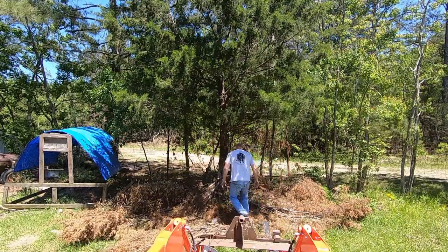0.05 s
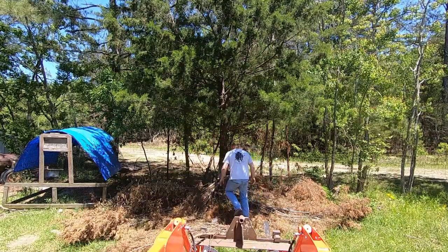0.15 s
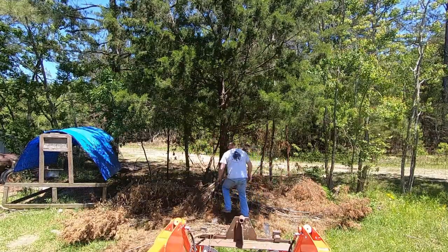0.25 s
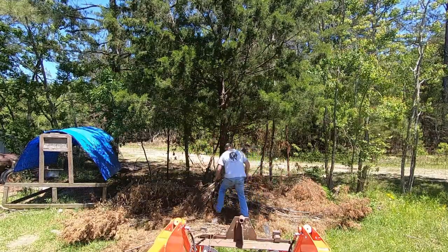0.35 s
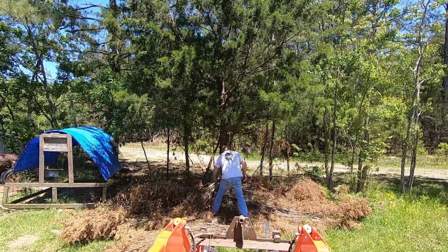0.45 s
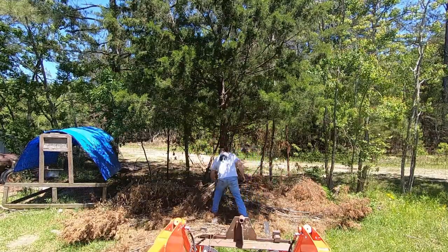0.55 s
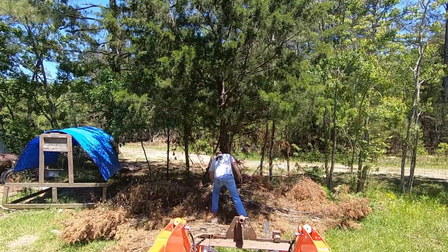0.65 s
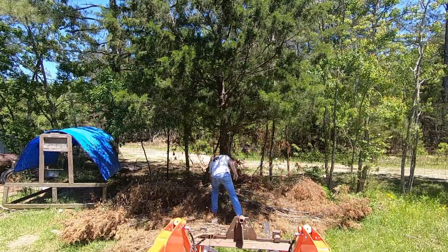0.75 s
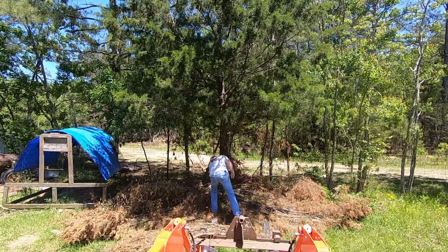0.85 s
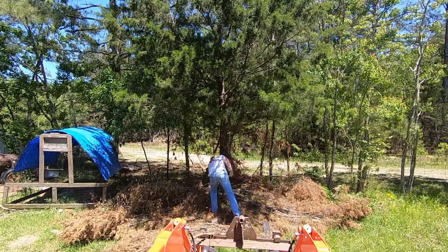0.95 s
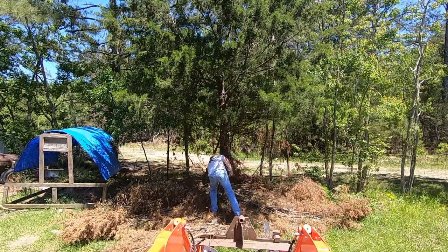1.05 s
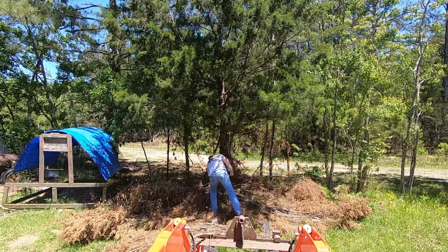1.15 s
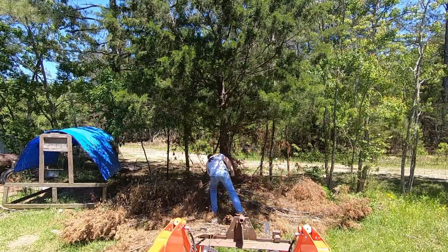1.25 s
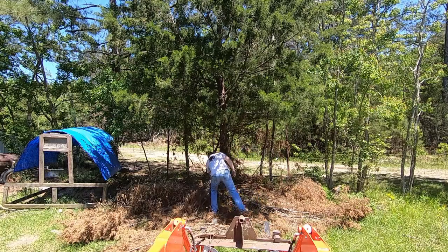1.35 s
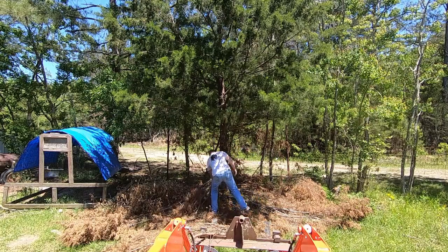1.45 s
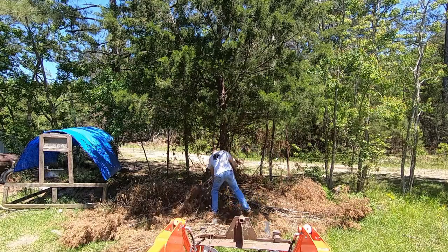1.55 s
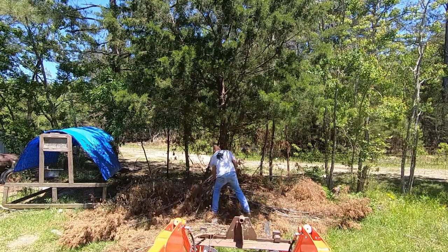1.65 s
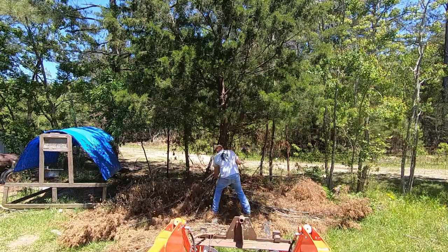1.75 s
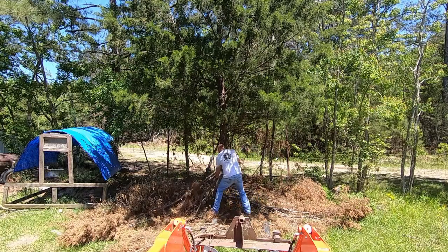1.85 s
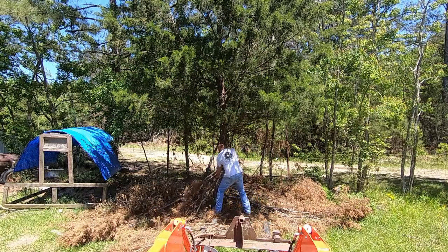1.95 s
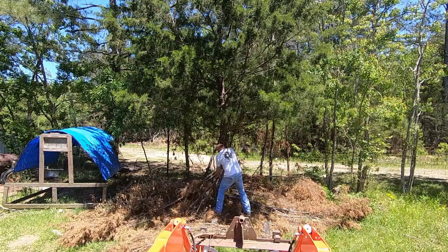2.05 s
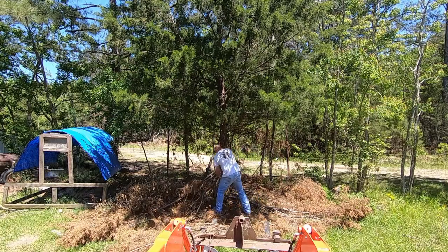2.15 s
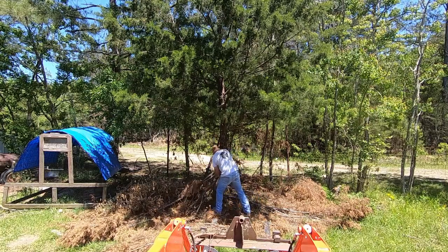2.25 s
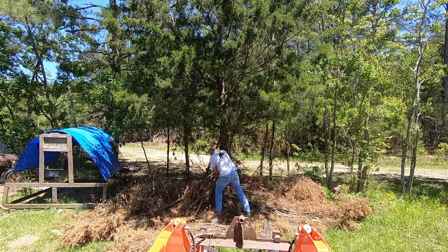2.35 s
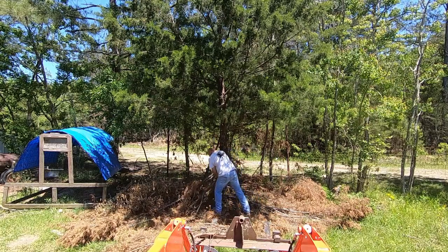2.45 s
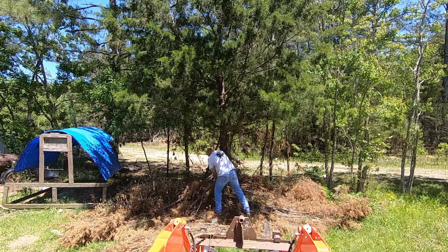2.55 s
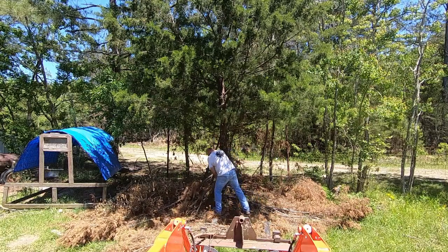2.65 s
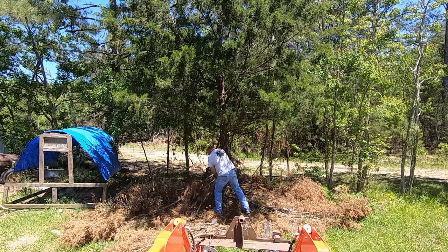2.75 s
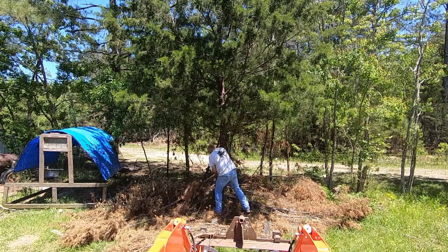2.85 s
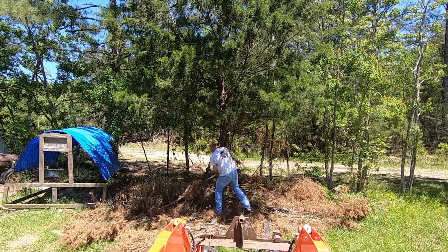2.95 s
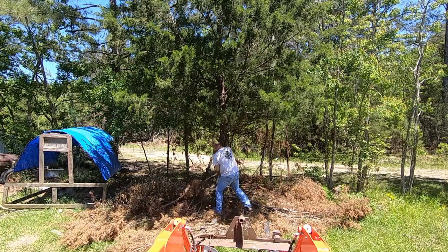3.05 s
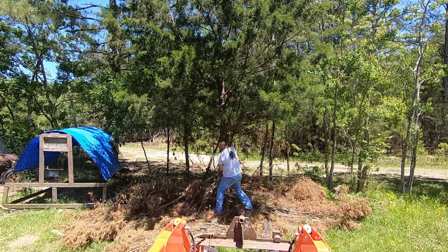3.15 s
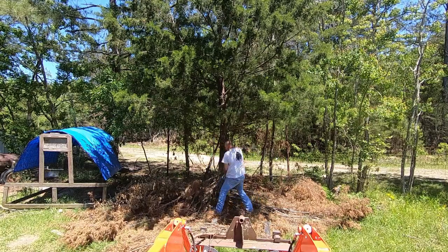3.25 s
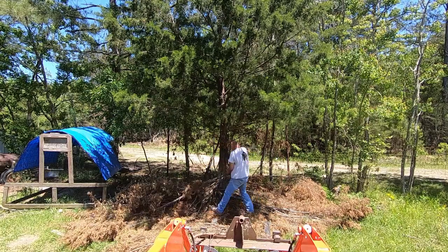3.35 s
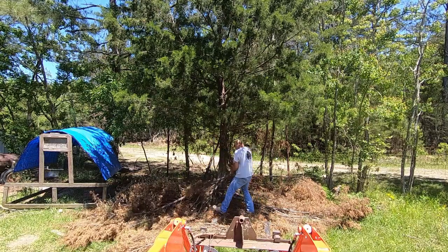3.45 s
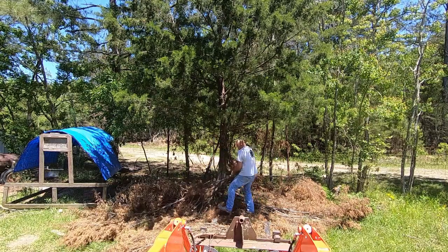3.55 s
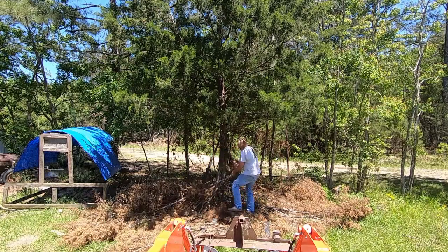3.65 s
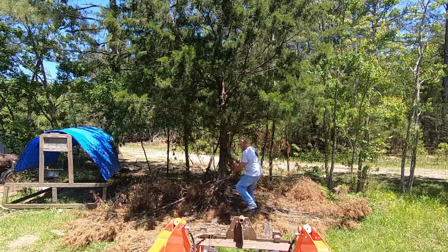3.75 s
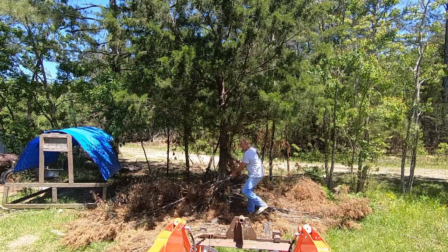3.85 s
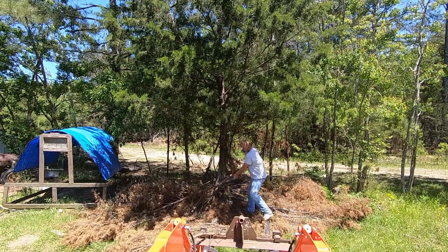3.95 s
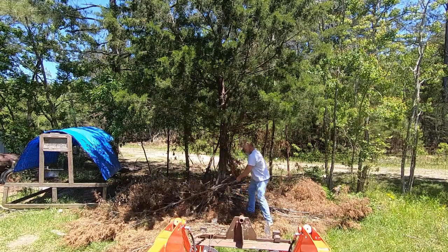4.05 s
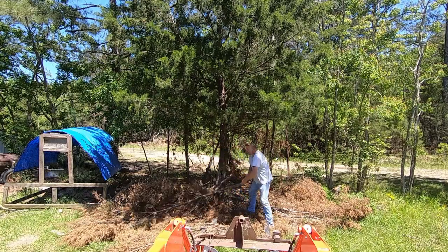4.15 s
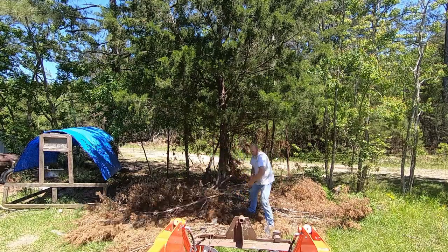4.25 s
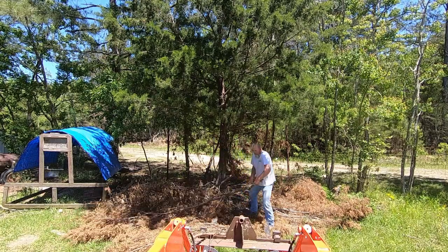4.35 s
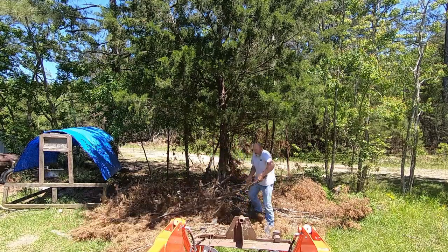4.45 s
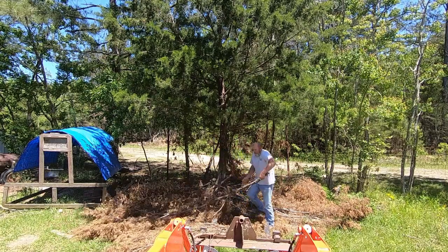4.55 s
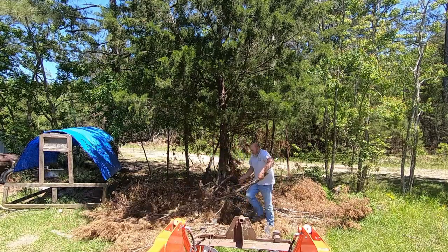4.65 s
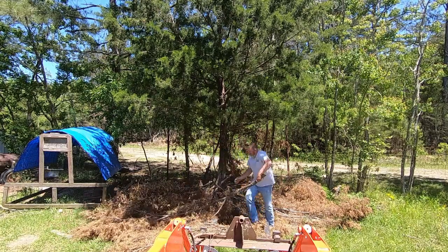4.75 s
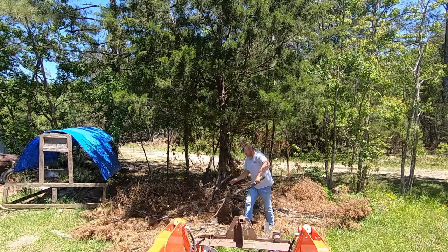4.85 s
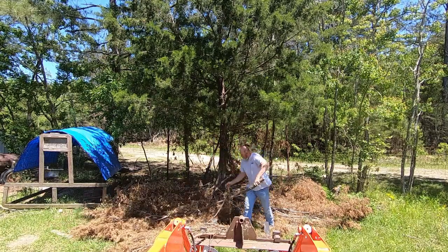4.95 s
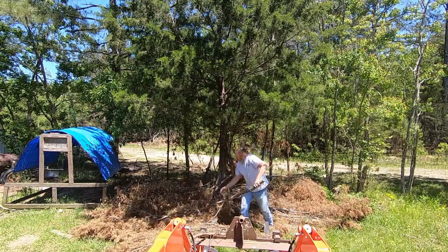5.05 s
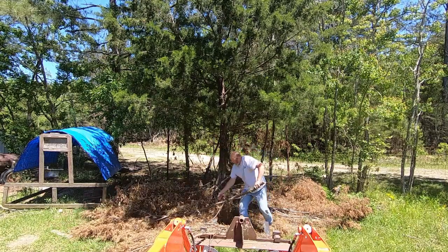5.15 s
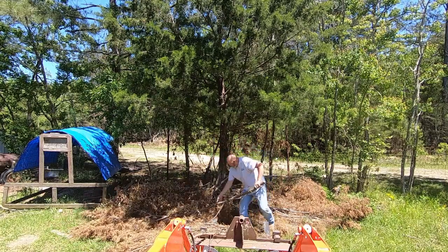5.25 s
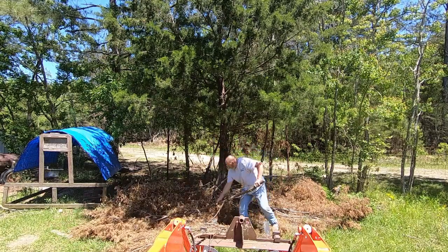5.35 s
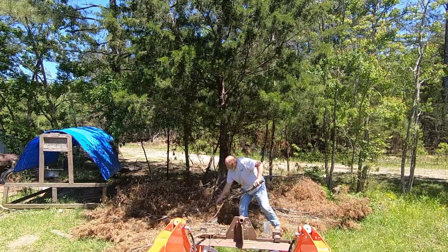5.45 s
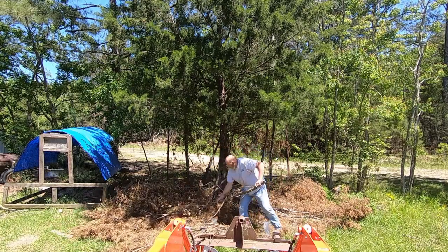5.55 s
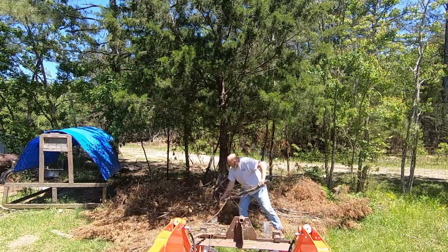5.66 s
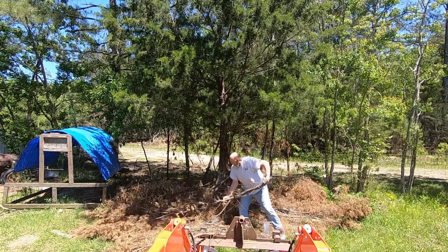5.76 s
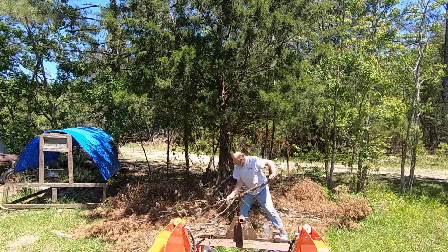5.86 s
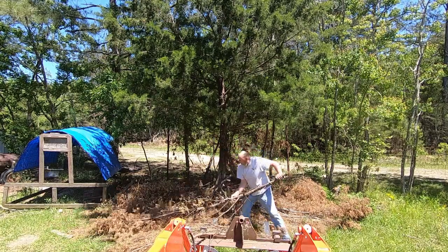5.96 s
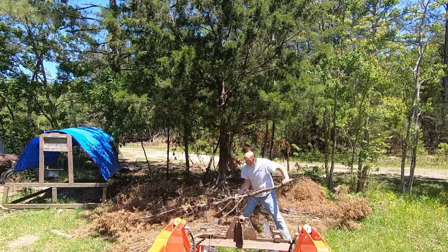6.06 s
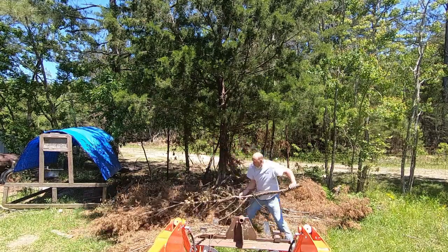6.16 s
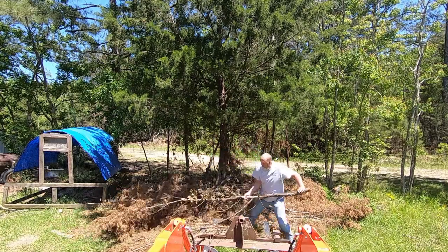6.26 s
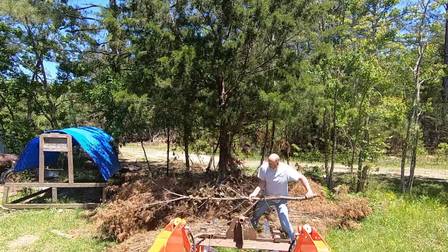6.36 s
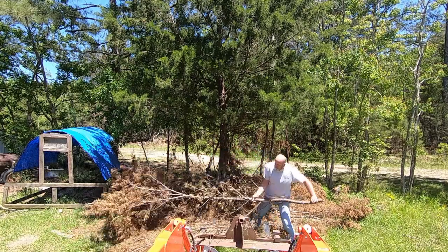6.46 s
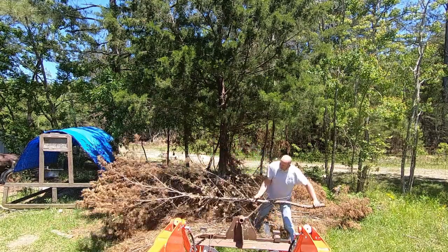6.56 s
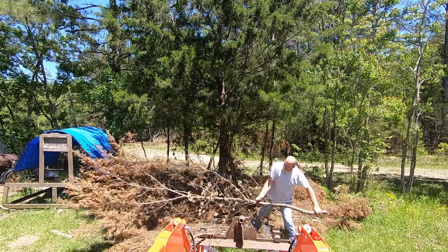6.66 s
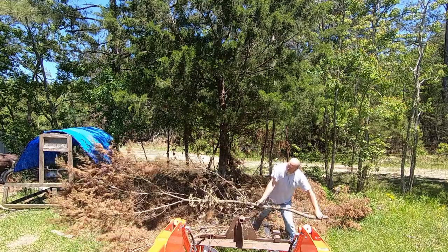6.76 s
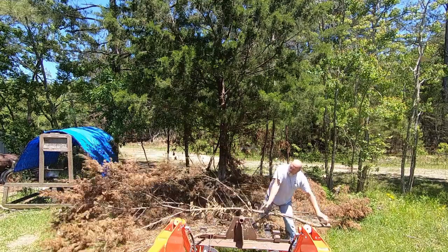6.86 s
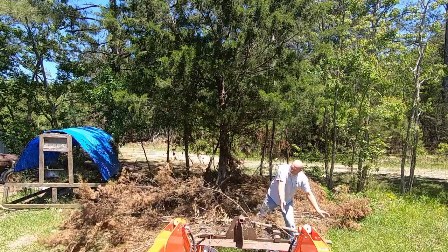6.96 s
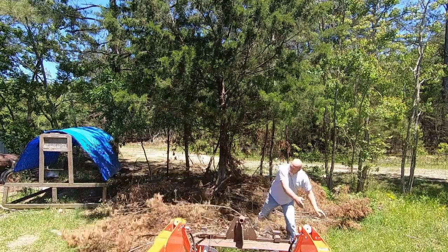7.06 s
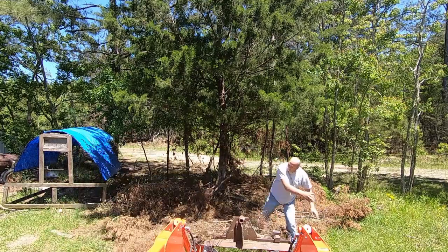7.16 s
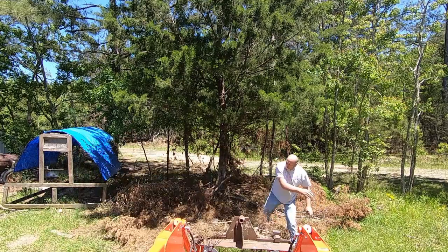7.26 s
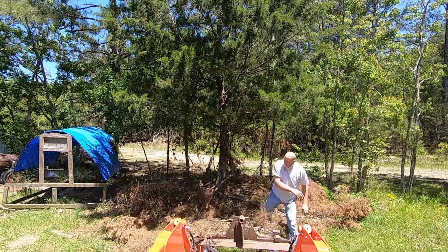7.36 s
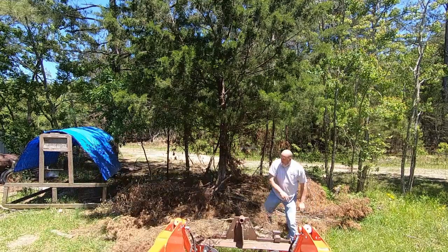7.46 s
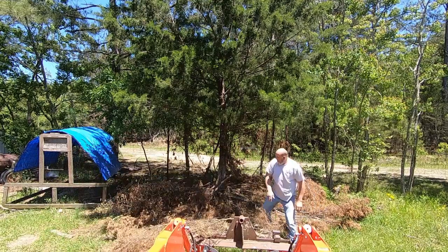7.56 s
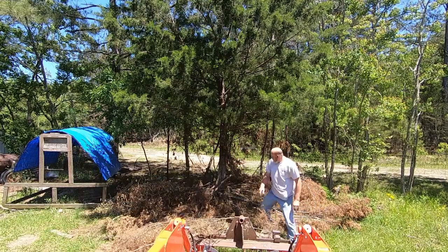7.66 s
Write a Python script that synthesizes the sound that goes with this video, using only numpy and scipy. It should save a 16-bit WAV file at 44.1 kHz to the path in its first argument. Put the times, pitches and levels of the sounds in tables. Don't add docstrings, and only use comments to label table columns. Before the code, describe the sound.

A dry brush pile is tugged and hauled outdoors, crackling and snapping in surges, then a limb knocks down amid buffeting wind.

```python
import sys
import numpy as np
from scipy import signal
from scipy.fft import rfft, irfft
from scipy.io import wavfile
from scipy.ndimage import uniform_filter1d

SR = 44100
rng = np.random.default_rng(int(sys.argv[2]) if len(sys.argv) > 2 else 0)


def boost(x):
    u = np.asarray(x, float) / 20
    return 10 ** u


def to_wav(s):
    ch = np.atleast_2d(s).T
    pcm = np.round(np.clip(ch, -1, 1) * 32767)
    wavfile.write(sys.argv[1], SR, pcm.astype(np.int16))


N = 340525

# [f/Hz, density/dB per Hz]
AIR_SPECTRUM = [(88, -23), (150, 20.5), (1250, -31.5), (3230, 7), (5780, 2), (8210, -41.5), (10400, 1),
                (13100, 4), (15600, -1)]
AIR_LEVEL_DB = -76

# [t/s, f/Hz, level/dB]
BIRD_CALL = [
    (.455, 3600, -80),
    (.495, 4130, -69),
    (.535, 3900, -70),
    (.578, 3270, -64),
    (.606, 3600, -69),
    (.625, 2850, -70),
    (.70, 3330, -68),
    (.735, 3120, -73),
    (.98, 3260, -86),
]
WOOD_T60_S, WOOD_WET_DB = .6, 6

# [peak t/s, push level/dB, rise/s, fall/s, turbulence/dB]
GUSTS = [(0, -31, 0.063, 0.12, 2.5), (0.16, -29.5, 0.14, 0.22, -8), (0.7, -30.0, 0.36, 0.27, -12),
         (0.83, -36, 0.056, 0.45, -7), (1.36, -38.5, 0.091, 0.42, -8), (1.94, -35.5, 0.3, 0.17, -6.5),
         (2.68, -38.5, 0.41, 0.53, -6), (3.02, -47, 0.091, 0.17, -2.0), (3.76, -42, 0.38, 0.44, -8.5),
         (4.37, -50, 0.095, 0.65, 6), (4.92, -41.0, 0.47, 0.18, 0), (5.2, -47.5, 0.14, 0.095, 7),
         (5.78, -43.0, 0.53, 0.173, 1), (6.17, -31, 0.1, 0.24, 8), (6.48, -30.5, 0.11, 0.11, 8),
         (6.72, -29.5, 0.25, 0.057, 5.5), (6.82, -25, 0.078, 0.2, 0.5), (7.35, -14.5, 0.14, 0.062, -15),
         (7.51, -13, 0.21, 0.149, 6.5), (7.71, -18.5, 0.096, 0.4, 7)]
# [peak t/s, buffet level/dB]
PUFFS = [(.03, -62), (.17, -64.5), (.72, -61.5), (1.75, -66), (1.95, -66), (2.76, -69), (3.48, -70),
         (4.25, -67), (5.7, -69), (6.07, -58), (6.19, -51), (6.27, -57), (6.35, -54), (6.5, -57.5),
         (6.71, -55), (7.16, -55), (7.25, -56), (7.34, -52), (7.41, -42.5), (7.49, -40), (7.66, -50)]
PUFF_RISE_S, PUFF_FALL_S = 0.043, 0.057
# [re push/dB, gain/dB per dB of turbulence, calm level/dB]
PUSH, FLUTTER, BUFFET = (1.313, 0, -48), (-25.5, 1.42, -78), (-36.5, 0.35, -76)
SHED_HZ, SHED_FULL_DB, SHED_DB_PER_OCTAVE = 10, -31, 13
WOBBLE_HZ, WOBBLE_DB = (31.4, 41.2), -3
PORT_LIMIT = .33

# [t/s, low mode level/dB, high re low/dB]
RATTLE = [
    (7.396, -85, -7),
    (7.402, -39.5, -6),
    (7.414, -40, -4),
    (7.42, -71, -8),
    (7.425, -43.5, -5),
    (7.45, -56.5, -2),
    (7.48, -72.5, -3),
]
RATTLE_MODES_HZ = 2975, 5830

# [t/s, peak level/dB, final f/Hz, t60/s]
JOLTS = [
    (7.486, -34, 153, 0.15),
    (7.634, -47, 203.6, 0.056),
    (7.42, -63, 200, .04),
    (7.33, -47, 113.7, 0.069),
    (7.67, -16.5, 3.14, 2.56),
]

# [t/s, blow level/dB, hardness/dB per octave]
FRAME_BLOWS = [
    (5.992, -30, 1),
    (5.997, -43, 7),
    (6.001, -27, 2),
    (6.009, -34, -5.5),
    (6.037, -32.5, 1),
    (6.069, -47, 9),
]
# [f/Hz, level/dB, t60/s]
FRAME_MODES = [(209, -12, .45), (295, -13, .12), (377, 0.5, .11), (500, -1, .08), (612, -10, .25),
               (722, -9, .09), (975, -10, .05), (1018, -3, .1), (1016, -25, .9), (1400, -16, .04)]
# [t/s, blow level/dB, hardness/dB per octave]
LANDING_BLOWS = [
    (7.147, -40, 1.5),
    (7.154, -33, -3),
    (7.164, -37, -3),
]
# [f/Hz, level/dB, t60/s]
LIMB_MODES = [(506, -1, 0.093), (732, -9, 0.069), (1177, 1, 0.089), (1800, 4, 0.054), (2370, -3, .05)]

# [t/s, peak level/dB, f/Hz, brightness/dB]
SNAPS = [(0.063, -62, 501, -6), (0.087, -60, 538, -5), (0.306, -57, 501, -8), (0.599, -65, 520, -11),
         (0.994, -54.5, 1520, -2), (1.096, -55, 662, -12), (1.368, -51, 619, -1), (1.677, -41.5, 1230, -3),
         (1.998, -55, 1060, -0.5), (2.464, -61, 518, 1.5), (2.989, -42, 806, 1), (3.988, -51, 740, -7),
         (4.162, -28, 1380, -16), (4.179, -42, 1530, -22), (4.243, -36, 1420, -9), (4.26, -38, 719, -1),
         (4.919, -54, 485.3, -3.5), (5.039, -52, 440, -5), (5.527, -56, 909, -6), (6.001, -28.5, 506, -17),
         (6.671, -45.5, 501.3, -7), (6.771, -55, 554, -3), (7.147, -33.5, 501, -12),
         (7.153, -30, 1140, -15), (7.164, -29.5, 1200, -9), (7.189, -35.5, 495, -3), (7.202, -39, 497, -8),
         (7.419, -41, 549, -5), (7.485, -45.5, 650, -23), (7.529, -47.5, 2130, -13)]
STICK_T60_S, STICK_T60_POWER = 0.055, -.25
# [t/s, peak level/dB]
CRACKS = [(0.7687, -52), (1.2471, -53), (1.287, -43), (1.381, -39), (1.779, -35), (1.8612, -31.5),
          (2.1454, -33.5), (2.6794, -45), (2.7674, -47.5), (2.8158, -32.5), (2.892, -34.5), (2.9674, -34),
          (3.028, -25), (3.278, -32), (3.3254, -26), (3.8684, -43), (3.9884, -26), (4.2314, -26),
          (4.2769, -23.5), (5.0038, -40), (5.3266, -51), (5.378, -40), (5.418, -50), (6.2296, -27),
          (6.332, -27.5), (6.8546, -43), (6.9025, -42), (6.9504, -42.5), (7.017, -46.5), (7.7134, -36)]
CRACK_T60_S = .065

# [f/Hz, density/dB per Hz]
BRUSH_SPECTRUM = [(120, -20), (200, -12.5), (321, -14.5), (430, -13), (760, -14.5), (1900, -11),
                  (4350, -9.5), (5930, -12), (7000, -8), (8000, -7), (9400, -9.5), (10500, -15.5),
                  (13300, -12.5), (15600, -18)]
# [peak t/s, level/dB, rise/s, fall/s, heft/dB]
EFFORTS = [(.07, -69.5, 0.43, 0.061, 10.5), (.58, -74, 0.078, 0.17, 14), (.91, -70, .047, .078, 3),
           (.99, -68, .021, 0.053, -2), (1.1, -68, 0.084, .074, -9), (1.3, -60.5, 0.063, 0.13, 0),
           (2.5, -69, 0.6, .3, -14), (2.7, -61.5, 0.15, 0.12, 2), (3.9, -51, 0.053, 0.096, -1.2),
           (4.92, -65, 0.063, 0.2, 9.5), (5.38, -59.5, 0.011, 0.1, -7), (6.54, -54, 0.2, 0.22, -11),
           (6.9, -60, 0.081, 0.039, -7.5), (7.52, -61, 0.97, 0.29, 9.5), (7.72, -63, 0.0092, .1, -1),
           (1.4, -56.5, 0.085, 0.23, 3), (1.6, -52.5, 0.15, 0.45, 1.5), (1.87, -64, 0.046, .08, -1.5),
        (1.99, -47, 0.27, 0.17, 1.8), (2.14, -54, .1, 0.094, -1), (2.85, -51, 0.13, 0.31, 0.6),
        (3.049, -42, .12, 0.31, -0.5), (3.34, -42, 0.038, 0.33, -0.7), (3.52, -39, 0.15, 0.14, -0.4),
        (3.997, -47, 0.011, 0.82, -3), (4.2, -40.5, 0.13, 0.5, -0.5), (4.46, -42, 0.45, .24, -0.5),
        (4.9, -61, .1, .1, 0), (5.68, -58, .1, 0.12, 0), (5.781, -42.5, 0.082, 0.46, -1.5),
        (6.0, -50.5, 0.016, 0.11, 10), (6.15, -55.5, 0.13, .45, 8), (6.25, -46.5, 0.051, 0.048, -1),
        (6.41, -42.5, 0.19, 0.063, -3.5), (7.05, -48, 0.11, 0.23, -3), (7.21, -47, 0.11, 0.15, 6.5)]
# [re needles/dB, gain/dB per dB of heft, rest level/dB]
NEEDLES, TWIGS, LIMBS = (0, 0, -76.5), (-11, 0.96, -77.5), (-25, 2.2, -77)
TIPS_FAR_DB, TIPS_NEARING_DB_PER_S = -9, 0.89
FLANK_POWER = 1.7


def unit(x):
    return x / np.sqrt(np.mean(x ** 2))


def played(table):
    s, *columns = np.transpose(table)
    return [np.interp(np.arange(N) / SR, s, c) for c in columns]


def band(x, lo_hz, hi_hz, order=2):
    sos = signal.butter(order, [lo_hz, min(hi_hz, .45 * SR)], "band", fs=SR, output="sos")
    return signal.sosfilt(sos, x)


def colour(x, spectrum):
    hz, db = np.transpose(spectrum)
    bins_hz = np.fft.rfftfreq(N, 1 / SR) + 1
    gain_db = np.interp(np.log(bins_hz), np.log(hz), db)
    return irfft(rfft(x) * boost(gain_db), N)


def walk(rate_hz):
    hold = int(SR / rate_hz)
    levels = rng.standard_normal(N // 200 + 1)[:N // hold + 1]
    held = np.repeat(levels, hold)
    return 1.4 * uniform_filter1d(uniform_filter1d(held, hold), hold)[:N]


def swells(rows, below_db, gain, rest_db):
    t = np.arange(0, N + 64, 64) / SR
    power = boost(2 * rest_db)
    for s, db, rise_s, fall_s, extra_db in rows:
        rising, falling = (s - t) / max(rise_s, .005), (t - s) / max(fall_s, .005)
        off = np.where(t < s, rising, falling)
        level_db = db + below_db + gain * extra_db - 10 * off ** FLANK_POWER
        power = power + boost(2 * level_db)
    return np.interp(np.arange(N) / SR, t, 10 * np.log10(power))


def tail(t60_s, rise_s=0.003):
    t = np.arange(SR) / SR
    return rng.standard_normal(SR) * (1 - np.exp(-t / rise_s)) * boost(-60 * t / t60_s)


def whistle(hz, db, table):
    t = np.arange(N) / SR
    sounding = (t > table[0][0]) * (t < table[-1][0])
    return boost(db) * np.sin(2 * np.pi * np.cumsum(hz) / SR) * sounding


def air():
    level_db = AIR_LEVEL_DB + 0.3 * walk(1.3)
    return boost(level_db) * unit(colour(rng.standard_normal(N), AIR_SPECTRUM))


def bird():
    hz, db = played(BIRD_CALL)
    warbled_hz = hz * (1 + .026 * walk(130))
    call = whistle(warbled_hz, db, BIRD_CALL) * (1 + .4 * walk(200))
    echoes = tail(WOOD_T60_S, rise_s=0.0052)
    echoes = echoes / np.sqrt(np.sum(echoes ** 2))
    return call + boost(WOOD_WET_DB) * signal.fftconvolve(call, echoes)[:N]


def wind():
    push_db, flutter_db = swells(GUSTS, *PUSH), swells(GUSTS, *FLUTTER)
    puffs = [(s, db - BUFFET[0], PUFF_RISE_S, PUFF_FALL_S, 0) for s, db in PUFFS]
    buffet_db = swells(list(GUSTS) + puffs, *BUFFET)
    eddies = rng.standard_normal((3, N))

    slowing_octaves = np.clip((push_db - SHED_FULL_DB) / SHED_DB_PER_OCTAVE, -1, 0)
    shed_hz = SHED_HZ * 2 ** slowing_octaves * 2 ** (.6 * np.tanh(walk(7)))
    shedding = np.sin(2 * np.pi * np.cumsum(shed_hz) / SR)
    rumble = colour(eddies[0], [(2, -35.0), (4, 14.5), (15, 10.0), (22, -9), (30, -56), (60, -94.0)])
    push = shedding + 0.4 * unit(rumble)

    flutter = colour(eddies[1], [(15, -45), (25, 11.5), (38, 1.0), (60, -9), (120, -71)])
    wobble = boost(WOBBLE_DB) * unit(band(eddies[1], *WOBBLE_HZ))
    buffet = colour(eddies[2], [(35, -50), (58, -1.5), (110, -5.0), (200, -15.5), (500, -26.5),
                                (1500, -44), (4000, -90)])
    burst_db = 3.5 * np.tanh(.6 * walk(25))

    slow = boost(push_db) * unit(push) + boost(flutter_db) * (unit(flutter) + wobble)
    limited = PORT_LIMIT * np.tanh(slow / PORT_LIMIT)
    return limited + boost(buffet_db + burst_db) * unit(buffet)


def rattle():
    low_db, high_re_low_db = played(RATTLE)
    waver = 1 + 0.00487 * walk(150)
    low = whistle(RATTLE_MODES_HZ[0] * waver, low_db, RATTLE)
    high = whistle(RATTLE_MODES_HZ[1] * waver, low_db + high_re_low_db, RATTLE)
    return low + high


def jolts():
    out, t = np.zeros(N + SR), np.arange(SR) / SR
    for s, db, hz, t60_s in JOLTS:
        sweep_hz = hz * (1 + 6 * np.exp(-t / 0.0014))
        turns = np.cumsum(sweep_hz) / SR
        out[int(s * SR):][:SR] += boost(db - 60 * t / t60_s) * np.sin(2 * np.pi * turns)
    return out[:N]


def knock(blows, modes):
    t, out = np.arange(SR) / SR, np.zeros(N + SR)
    onset = 1 - np.exp(-t / 0.0021)
    for s, blow_db, hard_db in blows:
        for hz, db, t60_s in modes:
            level_db = blow_db + db - 5.5 + hard_db * np.log2(hz / 600)
            mode = boost(level_db - 60 * t / t60_s) * np.sin(2 * np.pi * hz * t)
            out[int(s * SR):][:SR] += mode * onset
    return out[:N]


def splinter(lo_hz, hi_hz, t60_s, rise_s):
    burst = tail(np.clip(t60_s, .01, .3), rise_s)[:8192]
    burst = band(burst, lo_hz, hi_hz, order=1)
    return burst / np.abs(burst).max()


def snaps():
    out = np.zeros(N + SR)
    for s, db, hz, bright_db in SNAPS:
        t60_s = STICK_T60_S * (hz / 600) ** STICK_T60_POWER
        crack = boost(bright_db + 1.0) * splinter(3000, 14000, t60_s=0.016, rise_s=.0015)
        ring = splinter(hz / 1.65, hz * 1.61, t60_s, rise_s=0.001)
        out[int(s * SR):][:8192] += boost(db) * (ring + crack)
    for s, db in CRACKS:
        crack = splinter(2800, 10300, CRACK_T60_S, rise_s=0.00019)
        out[int(s * SR):][:8192] += boost(db - 5.5) * crack
    return out[:N]


def ticks(per_s, spread_db, smear_s):
    chance, size, sign = rng.random((3, N))
    size_db = np.minimum(-spread_db * np.log(size + 1e-9), 10.5)
    clicks = (chance < per_s / SR) * boost(size_db)
    keep = np.exp(-1 / (smear_s * SR))
    shower_power = signal.lfilter([1 - keep], [1, -keep], clicks ** 2)
    shower = np.sqrt(shower_power) * rng.standard_normal(N)
    return unit(clicks * np.sign(sign - .5) + 1.54 * shower)


def brush():
    efforts = EFFORTS
    needle_db, twig_db, limb_db = (swells(efforts, *part) for part in (NEEDLES, TWIGS, LIMBS))
    tip_db = TIPS_FAR_DB + TIPS_NEARING_DB_PER_S * np.arange(N) / SR
    wide = ticks(per_s=1500, spread_db=3.5, smear_s=0.0025)
    surge_db = .9 * walk(24)
    out = 0
    for hz in 220 * 2 ** np.arange(0, 6.3, .5):
        own = ticks(per_s=1.5 * hz, spread_db=2.0, smear_s=0.0011)
        part = band(0.55 * wide + own, hz / 2 ** 0.55, hz * 2 ** 0.3, order=1)
        limb, needle = np.clip(np.log2([1500 / hz, hz / 1500]) / [1.7, 1.3], 0, 1)
        twig = 1 - limb - needle
        db = limb * (limb_db + 19) + twig * (twig_db + 11.5) + needle * needle_db
        if hz > 10000:
            db = db + tip_db + 7.0
        patchy_db = 1.3 * walk(20)
        out = out + unit(part) * np.sqrt(hz) * boost(db + surge_db + patchy_db)
    return colour(out, BRUSH_SPECTRUM) * boost(-36)


def scene():
    branch = brush() + snaps()
    knocks = knock(FRAME_BLOWS, FRAME_MODES) + knock(LANDING_BLOWS, LIMB_MODES)
    mix = branch + knocks + bird() + rattle() + jolts() + wind() + air()
    return mix[None]


def low_pass(x):
    return signal.sosfilt(signal.butter(12, 15730, fs=SR, output="sos"), x)


def record(dry):
    return low_pass(dry)


dry = scene()
out = record(dry)
to_wav(out)
```